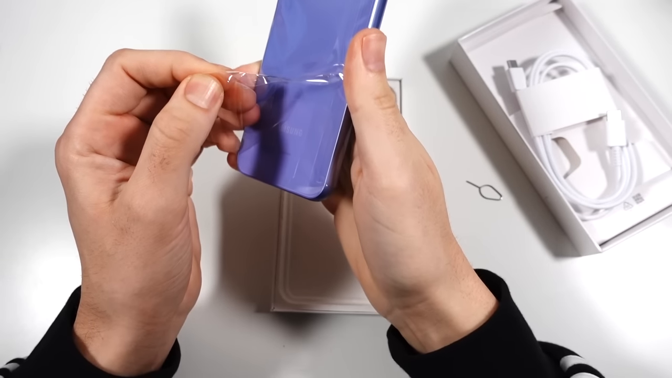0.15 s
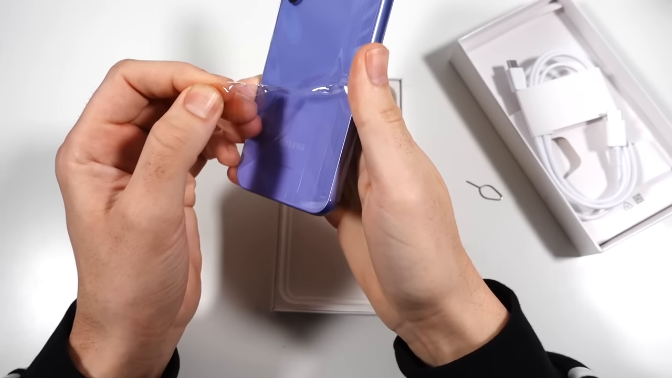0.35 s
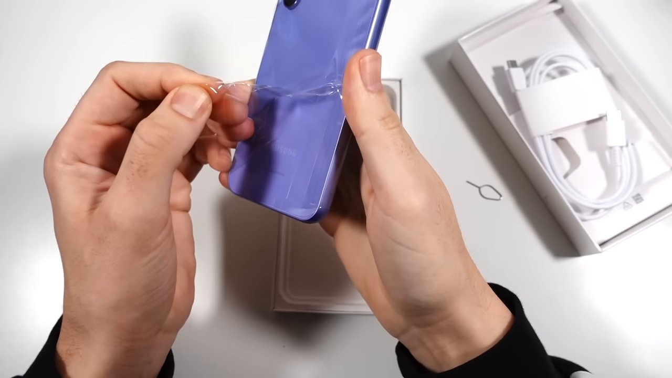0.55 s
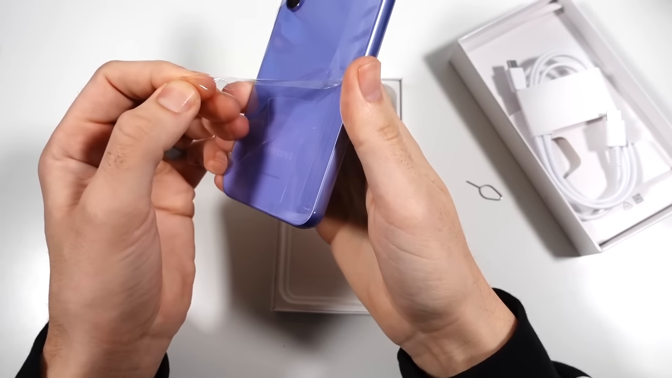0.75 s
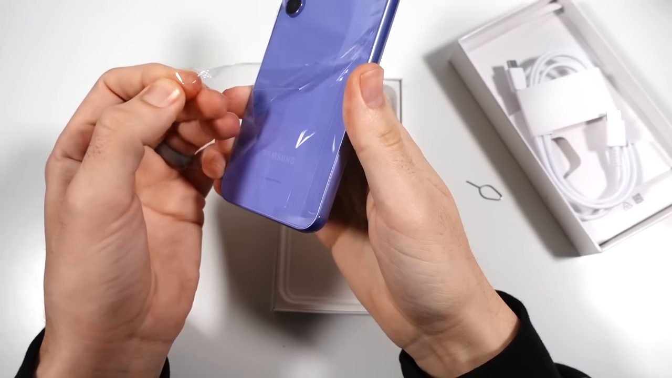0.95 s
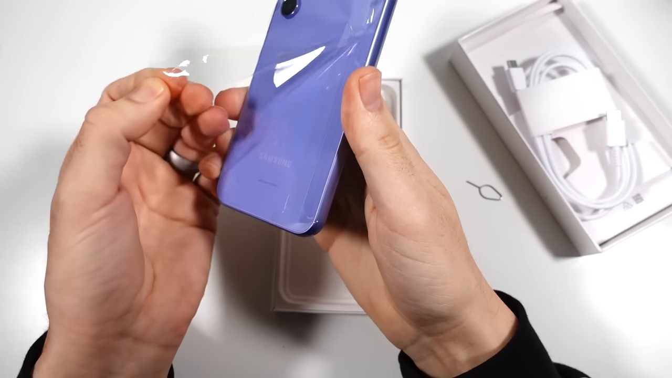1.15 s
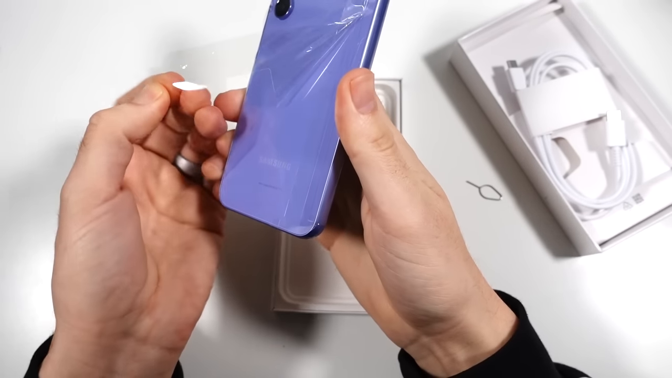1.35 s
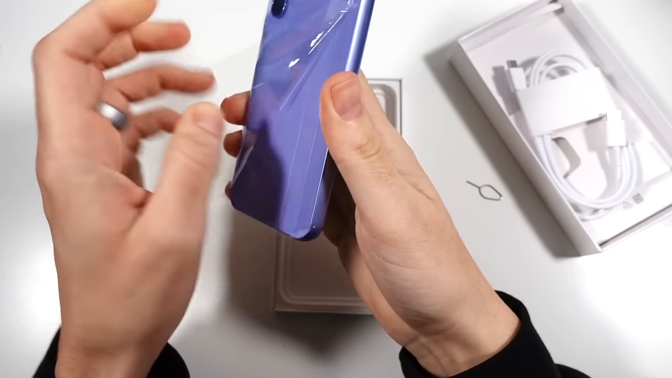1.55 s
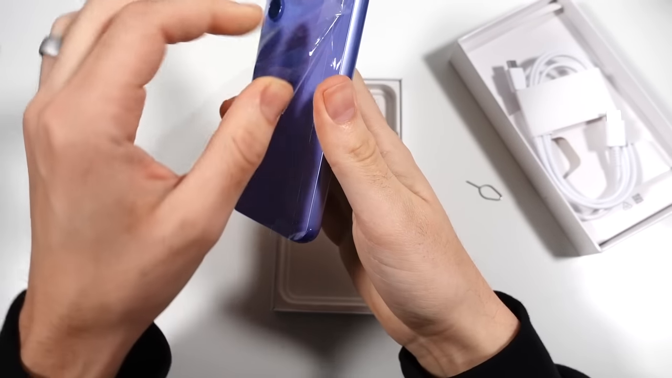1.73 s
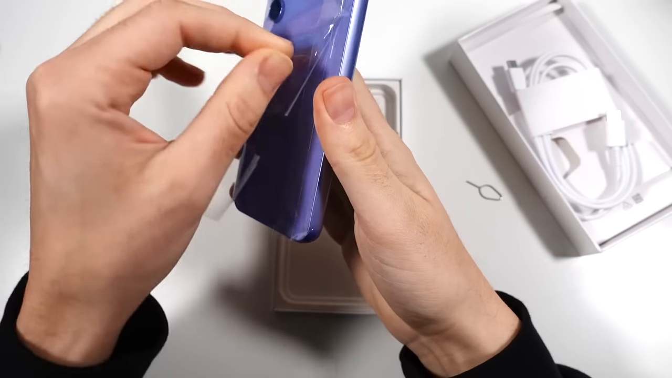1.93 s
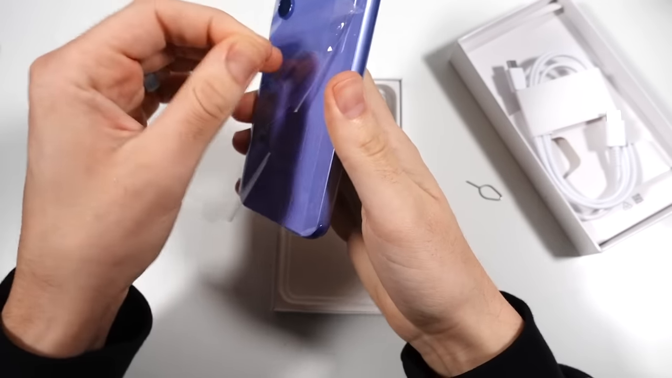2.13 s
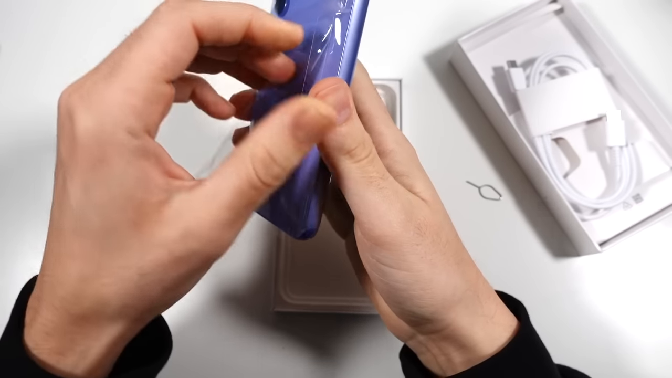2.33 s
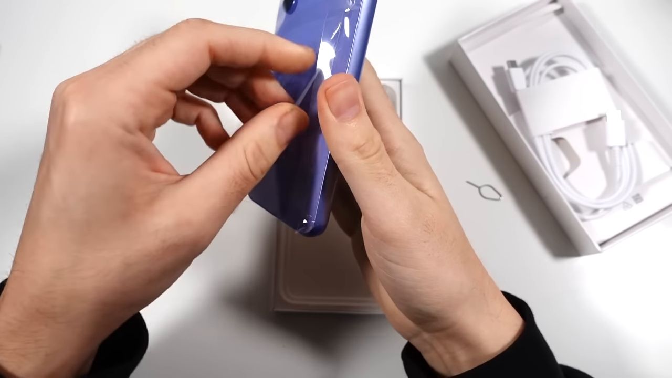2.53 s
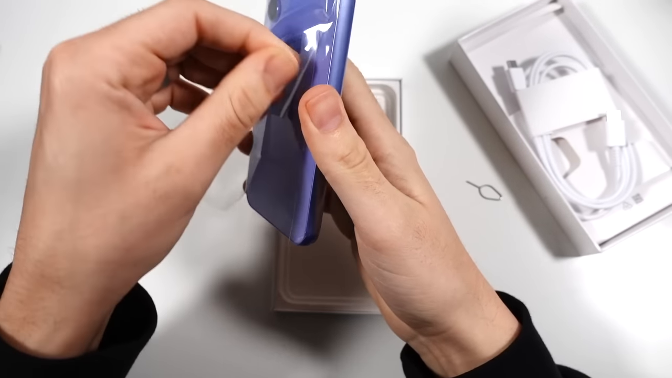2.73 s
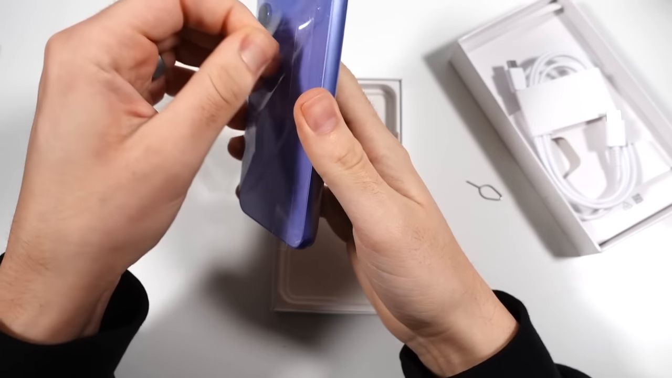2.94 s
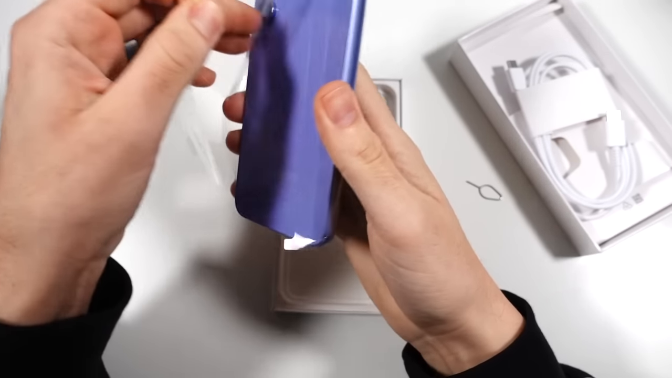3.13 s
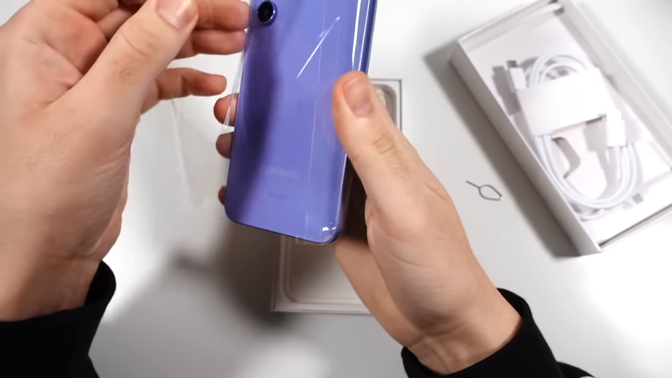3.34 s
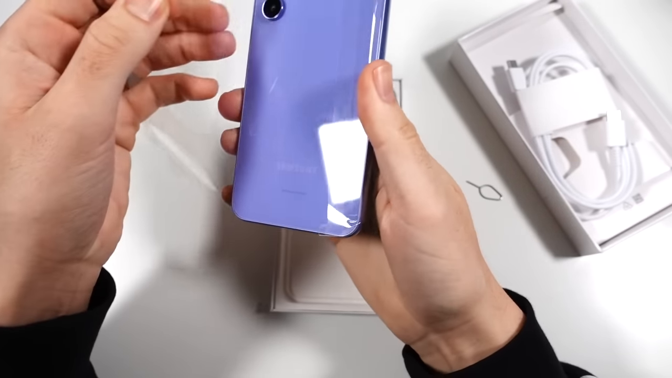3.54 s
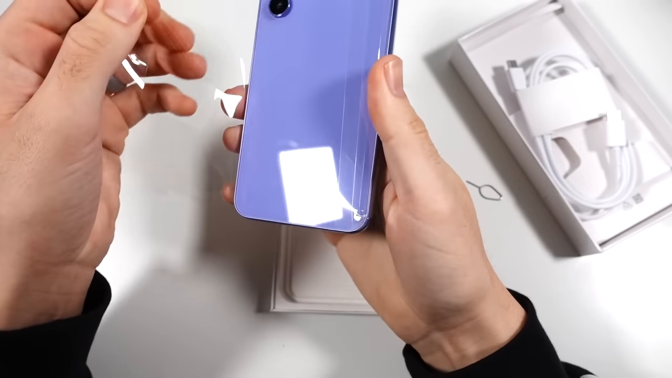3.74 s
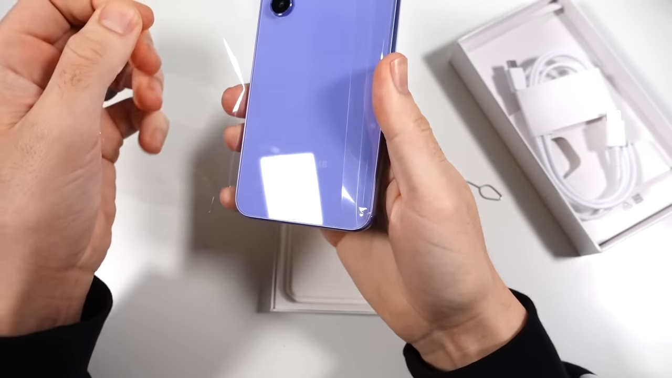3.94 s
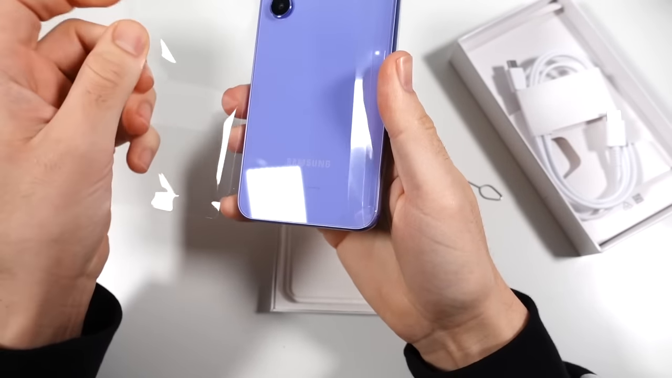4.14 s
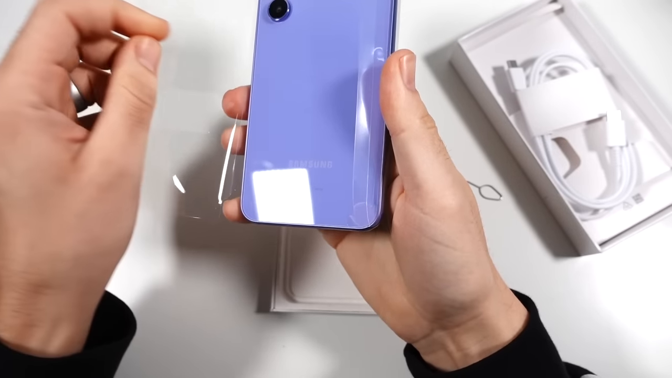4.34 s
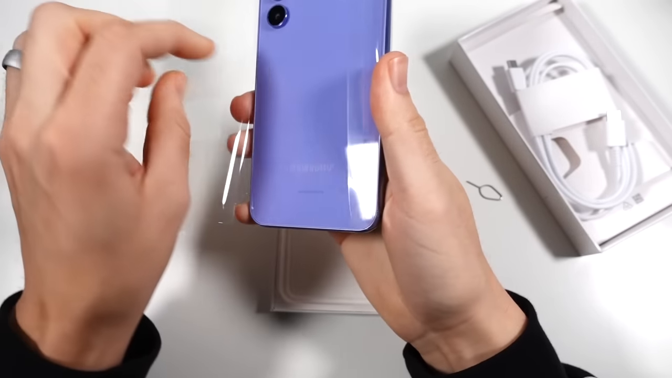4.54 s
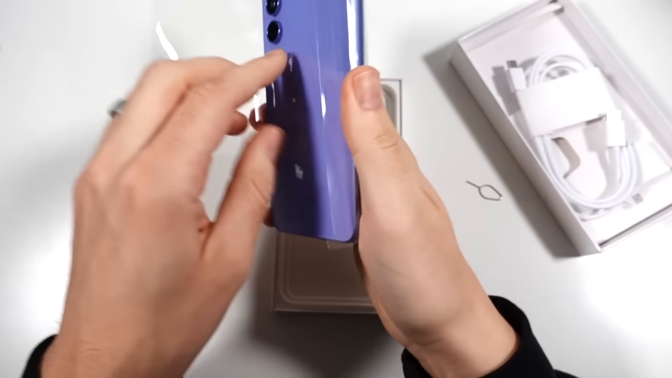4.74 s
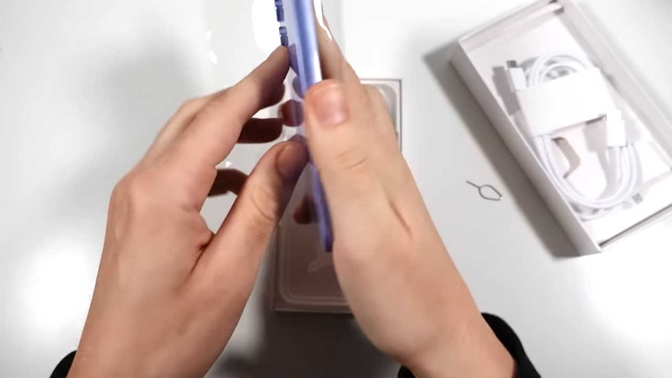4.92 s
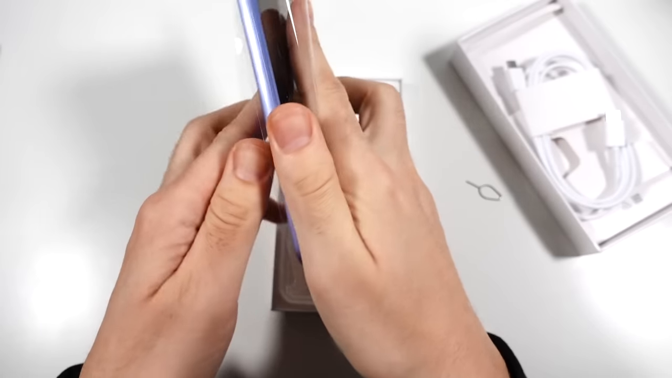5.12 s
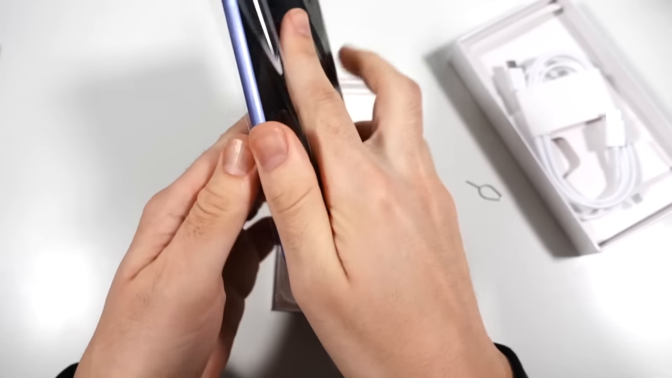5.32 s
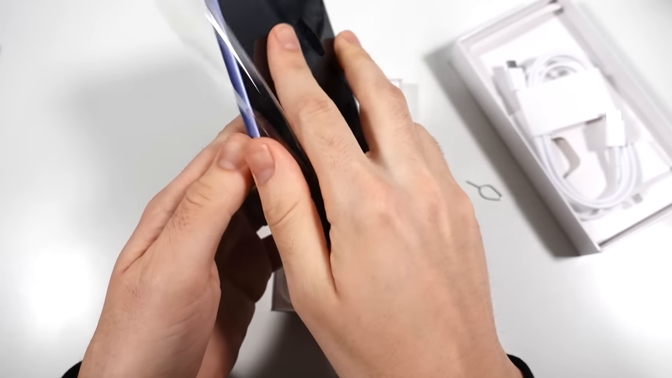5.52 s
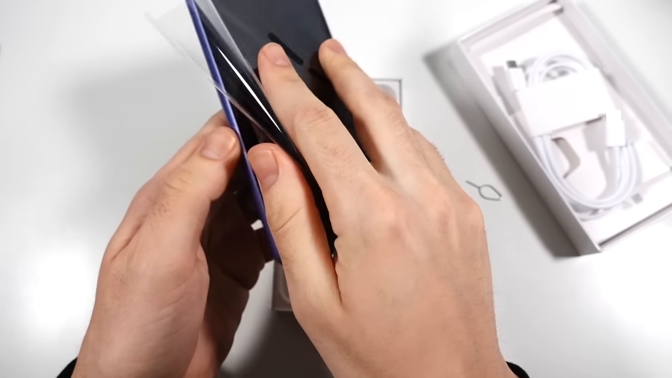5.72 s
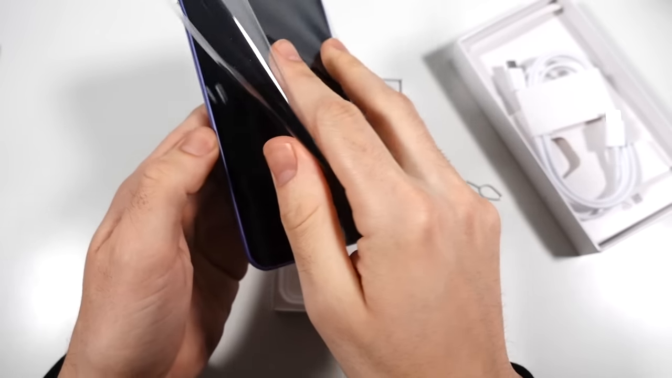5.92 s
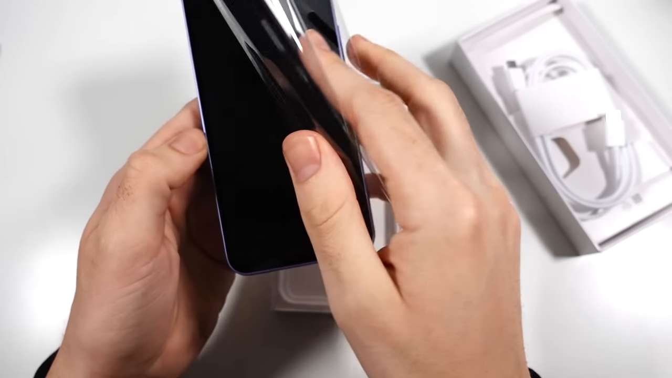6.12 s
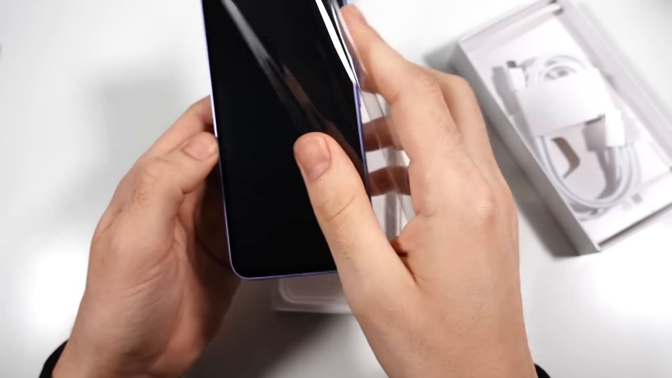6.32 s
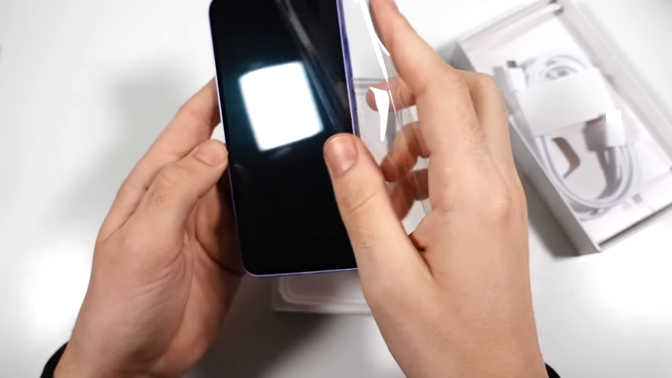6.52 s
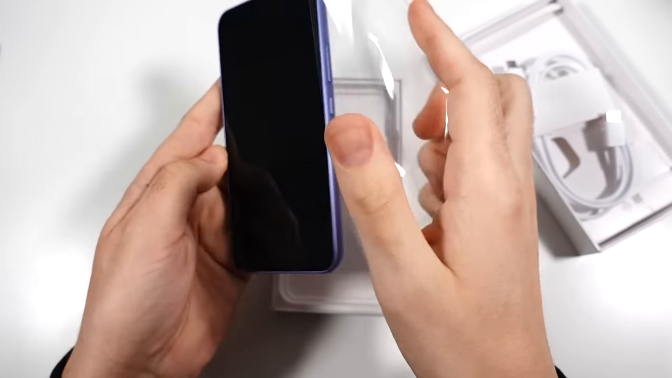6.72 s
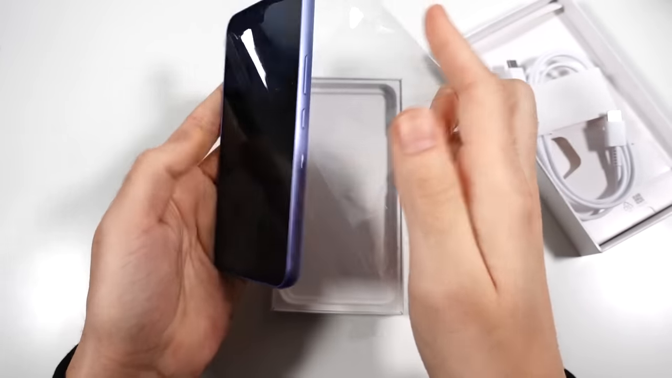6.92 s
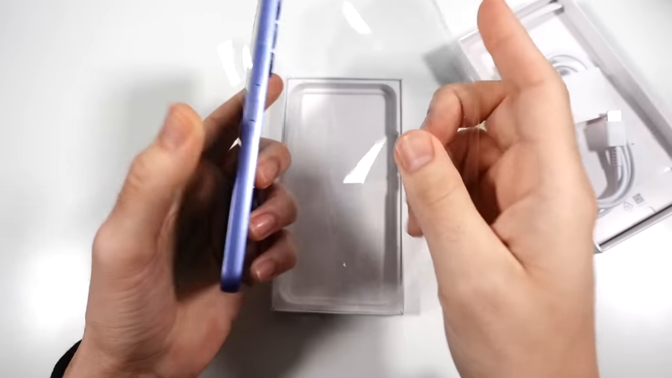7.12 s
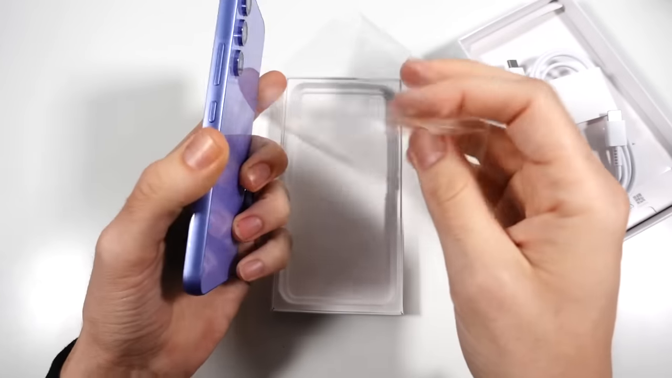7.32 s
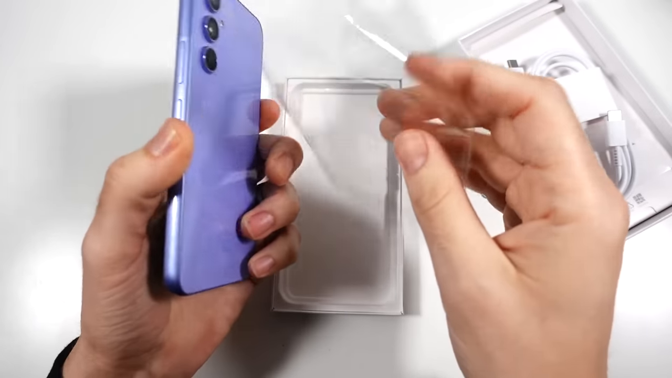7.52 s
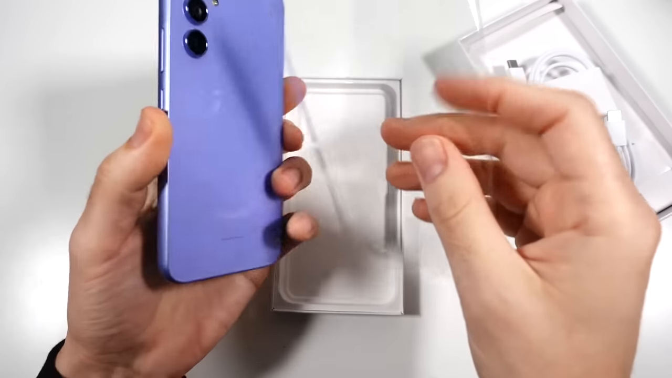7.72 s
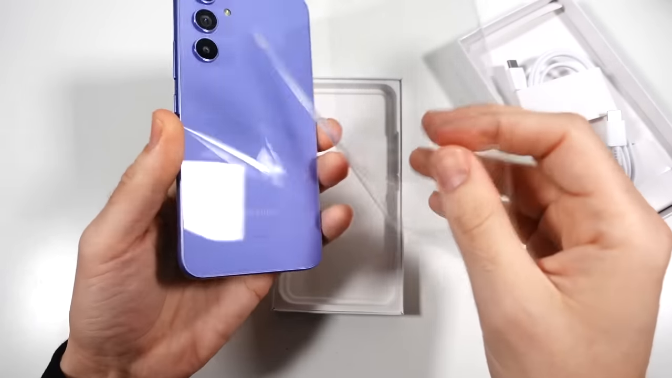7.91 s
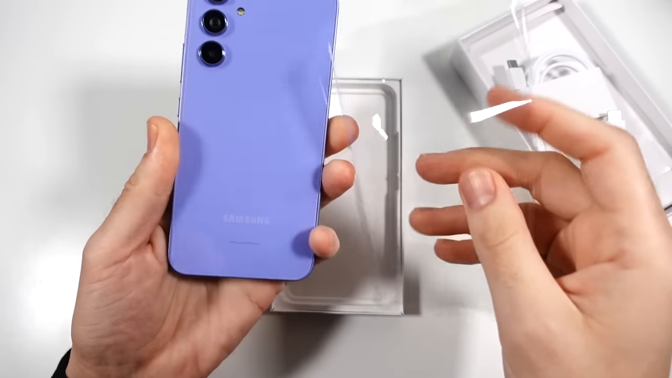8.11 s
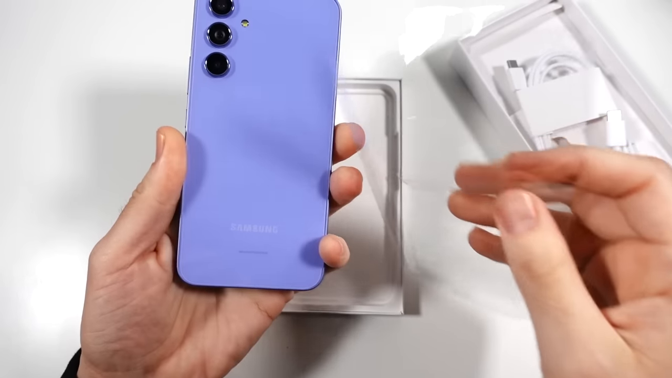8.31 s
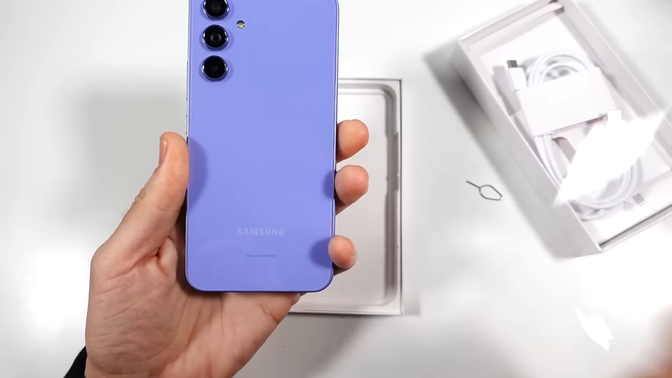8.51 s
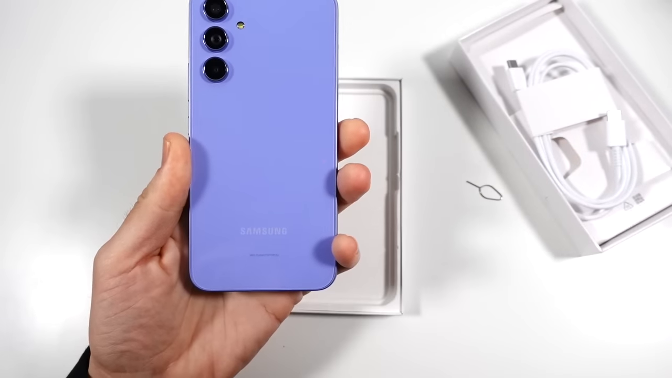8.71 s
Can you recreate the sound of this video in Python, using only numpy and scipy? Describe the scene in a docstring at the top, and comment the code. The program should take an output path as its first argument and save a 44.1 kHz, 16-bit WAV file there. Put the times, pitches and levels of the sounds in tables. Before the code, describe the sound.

Close, sharp crackles and light rustling of protective plastic being pulled from a phone by hand in a small room.

```python
"""Thin protective film, peeled off a phone by hand and pulled away, close-miked in a small, bare room.
Creases buckle with sharp snaps: short and bright in taut film, longer and duller in slack film.
Each pull makes the film crinkle and slide over the glass; near the end it squeaks under a fingertip.
The grip on the phone gives soft low bumps. The loudest snaps overload the recorder."""
import sys
import numpy as np
from scipy import signal
from scipy.fft import rfft, irfft, next_fast_len
from scipy.io import wavfile
from scipy.ndimage import uniform_filter1d

SR = 44100
rng = np.random.default_rng(int(sys.argv[2]) if len(sys.argv) > 2 else 0)


def wav_record(signal):
    """Record a signal, one row per channel, as 16-bit PCM in the file named by sys.argv[1]."""
    frames = np.transpose(np.atleast_2d(signal))
    bounded = np.clip(frames, -1, 1)
    # unit amplitude maps onto the largest positive 16-bit level
    quanta = np.round(bounded * 32767).astype(np.int16)
    wavfile.write(sys.argv[1], SR, quanta)


N = 390726
TIME = np.arange(N) / SR

# buckling creases: time_s, level_db, facet_hz, boom_re_level_db, sizzle_re_level_db
SNAPS = [(0.295, -59, 780, 13.5, -14), (.4093, -44.5, 3380, -5.5, -10), (.61, -33, 3360, -13.5, -12),
         (0.6486, -34, 8650, -21, -1), (0.722, -22.5, 6500, -11.5, 4.5), (0.7254, -13, 6240, -22.5, -2),
         (0.8476, -24.5, 6100, -33, 8.5), (.885, -14.5, 4930, -16.5, 4.5), (0.9323, -36, 7600, -24, 3),
         (0.9468, -36, 5660, -26, 5), (0.9951, -23.5, 6500, -23, -5.5), (1.0441, -33, 3630, -15, -4),
         (1.0897, -32.5, 3630, -15, -17), (1.1303, -35, 3750, -16, -20), (1.14, -23, 7300, -18.5, 1),
         (1.1779, -9, 3300, -10, -3.5), (1.231, -19.5, 7500, -20, -1), (1.4018, -33, 6400, -13, -12),
         (1.4177, -33.5, 3450, -5, -21), (1.445, -32.5, 2200, -21, -9.5), (1.455, -33.5, 5000, -10, -11),
         (1.4911, -27, 4540, -14.5, -7.5), (1.5, -38, 2290, -2, -4), (1.6256, -46.5, 3100, -6.5, -12.5),
         (1.8138, -47.5, 4300, -5, -13.5), (1.8604, -36, 6210, -17.5, -10), (1.954, -34.5, 3000, -30, -15),
         (2.0186, -41, 3300, -16, -14), (2.0299, -29, 4650, -17, -16), (2.042, -35.5, 6000, -26, -3),
         (2.061, -43, 4730, -18, -10), (2.216, -40, 3340, -7, -3), (2.2443, -47.5, 10000, 3, 3),
         (2.277, -45.5, 4940, -6, -8), (2.4974, -29.5, 4160, -14, -20), (2.5829, -39, 4940, -16, -9),
         (2.6527, -36.5, 5960, -11, -13), (2.8258, -51, 710, 1.5, -14), (2.8444, -53.5, 1440, 12, -27),
         (2.87, -36, 2940, -17, -20), (2.8887, -30, 4500, -21, -5), (2.9093, -14, 4400, -36, -7),
         (2.9665, -15, 4700, -21.5, -5), (2.9734, -12.5, 5500, -28, -3.5), (3.0307, -18.5, 5970, -45, -1.5),
         (3.0888, -26, 4870, -28, -2), (3.0955, -13.5, 5560, -19.5, -3.5), (3.1141, -15, 6200, -23, -0.5),
         (3.1191, -14, 4150, -15.5, -15), (3.1553, -21, 5910, -16, -12), (3.1657, -15.5, 2550, -13.5, -5),
         (3.2868, -30, 6000, -30, -7), (3.3173, -20.5, 6600, -7.5, -3.5), (3.3748, -28.5, 4900, -11, -4),
         (3.4957, -29, 2170, -1.5, -15.5), (3.6407, -21, 7800, -10.5, 0), (3.658, -30, 3140, -2.5, -5),
         (3.777, -34, 2820, -3.5, -26), (3.8237, -48, 755, 17.5, -19), (3.943, -53, 836, 11, -24),
         (4.0678, -52, 710, 10.5, -18), (4.1374, -21, 4000, -9.5, -4.5), (4.3687, -30, 2320, -0.5, -14),
         (4.388, -25.5, 3760, -1.5, -11), (4.3992, -26.5, 2340, -2, -2), (4.4461, -31.5, 6900, 6, 4),
         (4.453, -21, 5900, -4, -4.5), (4.4667, -24.5, 1050, -3.5, -22), (4.631, -34.5, 2560, -2.5, -15),
         (4.7748, -32, 2190, -6, -6), (4.7801, -24, 4270, -8, -9), (4.796, -31, 1500, -2, -26),
         (4.827, -38, 1340, 3, 0), (4.9143, -26, 1510, -2, -6), (4.9205, -17.5, 5600, -36, -12.5),
         (4.939, -34, 5440, -8, -15), (5.0523, -34.5, 1690, -0.5, -20), (5.1387, -25, 3200, -5, -4),
         (5.3344, -15, 5870, -25, -1.5), (5.4253, -30, 1620, -4.5, -23), (5.468, -29.5, 1320, -4, -9),
         (5.5658, -31, 5050, -22, 0), (5.5731, -22.5, 6060, -21, -3.5), (5.6547, -37, 4040, -8.5, -16),
         (5.674, -27.5, 1650, -4.5, -7.5), (5.7565, -26, 5800, -11.5, -16),
         (5.8976, -14.5, 3900, -18.5, -11), (5.9673, -23, 4840, -8.5, -10.5),
         (6.0487, -16.5, 2830, -10, -6.5), (6.067, -22, 3600, -14, -10), (6.0882, -28.5, 4000, -8, -16),
         (6.206, -36, 1430, -1, -19), (6.2547, -28, 3280, -10, -10), (6.2742, -15.5, 5270, -10, -4),
         (6.2885, -26, 3330, -7, -10), (6.4122, -26.5, 5170, -5.5, -11.5), (6.6259, -29, 5500, -7.5, -9),
         (6.7142, -28, 3770, -1.5, -23), (6.7735, -25, 3240, -14, -7), (6.8104, -27.5, 2840, -13, -21),
         (6.842, -24.5, 3080, -31, -9.5), (6.874, -28.5, 2520, -30, -12), (6.9051, -27.5, 6560, -22, -3),
         (7.064, -33.5, 2310, -2.5, -20), (7.0816, -33, 4470, -8, -18), (7.1084, -33, 2720, -14, -16),
         (7.1437, -19.5, 2520, -9, -9.5), (7.217, -13.5, 2090, -11, -11.5), (7.2285, -18.5, 5600, -12, -14),
         (7.278, -23.5, 3080, -8.5, -7), (7.3059, -19.5, 4740, -12, -9), (7.377, -43.5, 9400, 2, 11.5),
         (7.4785, -33, 5070, -12.5, -21), (7.53, -35.5, 4950, -6, -4), (7.577, -37.5, 3020, -6, -12),
         (7.6133, -27, 4870, -19, -31), (7.6384, -20.5, 4130, -24, -10), (7.711, -34, 4980, -8, -18),
         (7.8402, -42.5, 1480, 2, -6.5), (7.8515, -42, 4670, -6, -23), (7.8896, -44, 1900, 6, -7),
         (8.026, -44.5, 2780, 5, -22), (8.1223, -40.5, 3320, 1.5, -39), (8.2, -44.5, 920, 2.5, -18),
         (8.2193, -44, 3500, -4, -7), (8.2399, -38.5, 2830, -3, -17), (8.337, -39.5, 2950, -5, -8),
         (8.4344, -29.5, 5100, -13.5, -5), (8.485, -39, 4860, -9, -2), (8.508, -31.5, 5240, -25, -4),
         (8.5395, -24.5, 2580, -8, -4), (8.5634, -25.5, 4400, -21, -7), (8.5722, -26.5, 2780, -8, -8),
         (8.6173, -33.5, 1900, -11, -18), (8.643, -39, 6600, -10, -5), (8.7712, -44.5, 7400, -11, 5.5),
         (8.8477, -32.5, 10000, -21, 3)]
# how the film is held: time_s, slack (0-1), idle_rustle_db, idle_rumble_db
HOLD = [(0, 0, -70.5, -65), (.35, 0, -61.5, -67), (.58, 0.17, -84, -64.5), (.86, 0, -70, -60.5),
        (1.45, 0.22, -53.5, -62.5), (1.78, 0.3, -80, -62), (2.1, 0.32, -62.5, -61.5),
        (2.42, 0.26, -67, -64.5), (2.92, 0.09, -62.5, -59), (3.2, 0.3, -62.5, -63), (4, 0.03, -65.5, -55.5),
        (4.4, 0.6, -59.5, -55.5), (5.32, 0.19, -58, -57), (5.55, 0.57, -46.5, -61), (6.3, 0.5, -58, -56.5),
        (7.2, 0.53, -56, -55), (8, 0.45, -57.5, -49.5), (8.35, 0.73, -55.5, -63.5), (8.86, 0.3, -53.5, -61)]


def amp(db):
    return 10 ** (np.asarray(db) / 20)


def unit_energy(x):
    return x / np.sqrt(np.sum(x ** 2) + 1e-20)


def unit_rms(x):
    return unit_energy(x) * np.sqrt(len(x))


def at_hz(points, hz):
    """Interpolate on a log-frequency axis."""
    point_hz, value = np.transpose(points)
    return np.interp(np.log(hz + 1), np.log(point_hz + 1), value)


def hold_curve(column):
    rows = np.array(HOLD)
    return np.interp(TIME, rows[:, 0], rows[:, column])


def by_slack(taut, slack):
    """Per-sample blend of a taut-film and a slack-film value."""
    return taut + (slack - taut) * hold_curve(1)


def add(mix, start_s, sound):
    part = mix[max(round(start_s * SR), 0):][:len(sound)]
    part += sound[:len(part)]


def response(points, size=2048):
    """Minimum-phase taps from freq_hz, gain_db points."""
    log_gain = np.log(amp(at_hz(points, abs(np.fft.fftfreq(size, 1 / SR)))))
    spectrum = np.exp(np.conj(signal.hilbert(log_gain)))
    return np.fft.ifft(spectrum).real[:size // 2]


def fir(x, taps):
    return signal.oaconvolve(x, taps)[:len(x)]


def gesture(length_s, attack_s, release_s, sag_db=-1):
    """Envelope of one hand movement: attack, sagging hold, release."""
    t = TIME[:SR]
    attack = np.minimum(t / attack_s, 1)
    sag = amp(sag_db * np.minimum(t / length_s, 1))
    return attack * sag * np.exp(-np.maximum(t - length_s, 0) / release_s)


def film_mode(x, hz, width_hz):
    """One resonance of the film, at unit energy."""
    r = np.exp(-np.pi * width_hz / SR)
    return unit_energy(signal.lfilter([1, 0, -1], [1, -2 * r * np.cos(2 * np.pi * hz / SR), r * r], x))


def bending_waves(t60_s, crack):
    """A crack, then waves that bounce about the film and die fast."""
    t = TIME[:2048]
    waves = unit_energy(rng.standard_normal(len(t)) * amp(-60 * t / max(t60_s, .002)))
    return unit_energy(waves + crack * (t == 0))


def effort(release_s=0.012, stir_s=0.015, stir_lead_s=0.0031):
    """Film level (dB) and power-weighted tilt (dB/oct) from idle rustle, pulls and snaps."""
    # pulls and crumples: start_s, length_s, level_db, tilt_db_per_oct
    pulls = [(0, 0.077, -70, 11), (.385, 0.068, -53, 2), (0.704, 0.035, -48, 0.5), (0.831, 0.23, -46, 4),
             (1.196, .11, -47, -1), (1.429, 0.05, -44, -3), (1.58, 0.059, -55.5, -4),
             (1.936, 0.011, -52, 0), (1.995, 0.082, -50, 1.5), (2.101, 0.029, -59.5, 6.5),
             (2.162, .11, -49.5, 3), (2.295, .025, -52.5, 2.5), (2.344, .022, -59, 5),
             (2.499, 0.055, -46, 1), (2.595, .1, -56, 5), (2.74, .04, -51, -1), (2.89, 0.19, -42, 2),
             (3.099, 0.18, -40.5, 1), (3.149, 0.012, -22.5, 2.5), (3.225, 0.2, -41.5, -2.5),
             (3.633, .04, -45, -5.5), (3.822, 0.027, -43, -3.5), (4.133, 0.04, -42.5, -6.5),
             (4.281, 0.098, -64.5, -20), (4.365, 0.12, -45, -1), (4.644, 0.018, -46.5, -4),
             (4.755, 0.1, -41.5, -4), (4.921, 0.026, -34.5, -2), (5.134, 0.0635, -43.5, -3.5),
             (5.338, 0.27, -46, -1.5), (5.554, 0.045, -30.5, -.5), (5.641, 0.036, -39.5, -4),
             (5.699, .15, -46, 0.5), (5.913, 0.099, -46, -4.5), (6.046, 0.041, -28.5, -1.5),
             (6.108, 0.025, -37, -1), (6.25, 0.11, -46, 1), (6.369, 0.14, -41, 0.5), (6.614, 0.06, -39, -2),
             (6.69, 0.14, -35, 0), (6.745, 0.18, -34, -2), (7.047, 0.11, -45, -4.5),
             (7.196, 0.14, -33, -1.5), (7.343, 0.044, -36.5, 1), (7.39, 0.12, -55, 9),
             (7.57, 0.018, -40.5, -1), (7.606, 0.051, -34.5, -3), (7.747, 0.028, -44, -2),
             (7.92, 0.098, -55, -3.5), (8.15, 0.044, -46, -2.5), (8.502, 0.081, -35.5, -1.5)]
    power = amp(hold_curve(2)) ** 2
    weighted_tilt = -0.11 * power
    for start_s, length_s, level_db, tilt_db_per_oct in pulls:
        pull = (amp(level_db) * gesture(length_s, 0.2 * length_s, release_s)) ** 2
        add(power, start_s, pull)
        add(weighted_tilt, start_s, tilt_db_per_oct * pull)
    # small creases stir around each snap
    stir_db = by_slack(taut=-26.5, slack=-15.5)
    for time_s, level_db, *_ in SNAPS:
        stir = amp(level_db + stir_db[round(time_s * SR)]) * gesture(stir_s, stir_lead_s, release_s)
        add(power, time_s - stir_lead_s, stir ** 2)
    return 10 * np.log10(power), weighted_tilt / power


def sliding(catch_db=3.5, catch_s=0.0024):
    """Film on glass: a hiss that catches and lets go."""
    grab = unit_rms(uniform_filter1d(rng.standard_normal(N), int(catch_s * SR)))
    return unit_rms(rng.standard_normal(N) * amp(catch_db * grab))


def tiny_creases(ticks_per_s=330, spread_db=3.5, count=24):
    """Small creases tick at random, each at its own pitch; a few ticks stand out."""
    out = np.zeros(N)
    for hz in np.geomspace(700, 12000, count):
        strength = amp(spread_db * np.minimum(rng.exponential(1, N), 3.5))
        ticks = strength * (rng.random(N) < ticks_per_s / count / SR)
        waves = bending_waves(t60_s=rng.uniform(0.02, 0.064), crack=0.75)
        ring = 0.97 * np.sqrt(hz / 10000) * film_mode(waves, hz, width_hz=0.063 * hz)
        out += fir(ticks, unit_energy(waves + ring))
    return unit_rms(out)


def crinkle(gain_db=0.5, tick_db=10, leveling_s=0.057, pivot_hz=3000):
    """Film slides under light effort and ticks under more; slack film buckles sooner."""
    # crinkle spectrum: freq_hz, density_db
    film_spectrum = [(100, -18.5), (250, -7.5), (400, -7), (600, 1.5), (800, -1.5), (1800, 2.5), (3000, 3),
                     (5000, 2.5), (7000, -0.5), (10000, -7), (12500, -14), (16000, -21.5)]
    effort_db, tilt_db_per_oct = effort()
    buckle_db = by_slack(taut=-51, slack=-62)
    tick_gain = amp(tick_db + np.minimum(effort_db - buckle_db, 0))
    grains = sliding() + tick_gain * tiny_creases()
    grains /= np.sqrt(uniform_filter1d(grains ** 2, int(leveling_s * SR)) + 1e-9)
    # time-varying tilt over seven octave bands
    size = next_fast_len(N)
    spectrum = rfft(unit_rms(fir(grains, response(film_spectrum))), size)
    octave = np.clip(np.log2((np.fft.rfftfreq(size, 1 / SR) + 1) / pivot_hz), -3, 3)
    out = np.zeros(N)
    for centre_oct in range(-3, 4):
        band = irfft(spectrum * np.maximum(1 - abs(octave - centre_oct), 0), size)[:N]
        out += band * amp(tilt_db_per_oct * centre_oct)
    return amp(effort_db + gain_db) * out


def handling(gain_db=-1, jolts_per_s=45, spread_db=7.5, rub=0.53):
    """Fingers shift on the phone in small jolts over light, steady rubbing."""
    # grip shifts: start_s, length_s, level_db
    shifts = [(0.873, .02, -63.5), (1.064, 0.1, -53), (1.463, 0.045, -52), (2.491, 0.028, -48),
              (3.02, .15, -52), (3.31, .025, -55), (3.47, 0.038, -49), (4.121, 0.025, -39),
              (4.368, 0.093, -36.5), (4.769, 0.024, -42), (4.917, 0.028, -46), (5.125, 0.042, -48),
              (5.407, 0.23, -51.5), (6.744, 0.17, -42.5), (7.064, 0.31, -49.5), (7.613, 0.023, -36),
              (7.85, 0.31, -60)]
    # handling rumble spectrum: freq_hz, density_db
    rumble_spectrum = [(10, -23), (25, -4), (45, -1.5), (65, 0.5), (100, -4), (150, -12), (220, -17),
                       (400, -24), (1000, -53.5)]
    grip = amp(hold_curve(3))
    for start_s, length_s, level_db in shifts:
        add(grip, start_s, amp(level_db) * gesture(length_s, attack_s=0.0044, release_s=0.017))
    jolts = rng.standard_normal(N) * amp(spread_db * rng.exponential(1, N))
    jolts *= rng.random(N) < jolts_per_s / SR
    force = unit_rms(jolts) + rub * rng.standard_normal(N)
    rumble = fir(force, response(rumble_spectrum, size=16384))
    rumble /= np.sqrt(uniform_filter1d(rumble ** 2, size=4500) + 1e-9)
    return amp(gain_db) * grip * rumble


def room_air(level_db=-68):
    """Steady noise of still air."""
    # room tone: freq_hz, density_db
    air_spectrum = [(40, -17), (120, -16), (220, -4.5), (400, -21), (1000, -28), (3000, -33.5), (8000, -29),
                    (16000, -42)]
    return amp(level_db) * unit_rms(fir(rng.standard_normal(N), response(air_spectrum, size=16384)))


def bumps():
    """Soft knocks of hands and arms; each swells and dies on one low note."""
    # knocks: start_s, level_db, pitch_hz, swell_s
    knocks = [(0.099, -48, 29.4, 0.19), (1.797, -48.5, 122, 0.0062), (7.89, -40, 98, 0.024)]
    out, t = np.zeros(N), TIME[:SR]
    for start_s, level_db, pitch_hz, swell_s in knocks:
        envelope = t / swell_s * np.exp(1 - t / swell_s)
        add(out, start_s, amp(level_db) * envelope * np.sin(2 * np.pi * pitch_hz * t))
    return out


def snaps(crack, mode_share, pivot_hz=4000):
    """A crease flips: its facet rings, the sheet booms, the fold sizzles. Large, low facets ring longest."""
    # facets beside a crease: freq_hz, density_db
    facet_spectrum = [(500, -46), (1100, -12), (1550, -5.5), (2500, 1.5), (4000, 2.5), (6300, 0.5),
                      (7500, -11), (10000, -41.5)]
    # whole sheet, jolted: freq_hz, density_db
    sheet_spectrum = [(30, -15.5), (100, -2.5), (200, -5.5), (330, -9), (550, -1), (780, 0), (1000, -1),
                      (1400, -3.5), (1800, -4.5), (3000, -41.5)]
    # crack at the fold: freq_hz, density_db
    fold_spectrum = [(4000, -38.5), (6200, -1), (7200, 7), (9500, 2), (12000, -4.5), (14500, -8.5),
                     (16500, -15)]
    facet, sheet = response(facet_spectrum), response(sheet_spectrum)
    pivot_t60_s = by_slack(taut=0.006, slack=0.043)
    tilt_db_per_oct = by_slack(taut=4.5, slack=-9)
    scale = np.sqrt(.005 * SR)  # energy of 5 ms at rms 1
    out = np.zeros(N)
    for time_s, level_db, facet_hz, boom_db, sizzle_db in SNAPS:
        i = round(time_s * SR)
        t60_s = pivot_t60_s[i] * (pivot_hz / facet_hz) ** 0.42
        fold = response([(hz, db + tilt_db_per_oct[i] * np.log2(hz / pivot_hz))
                         for hz, db in fold_spectrum])
        parts = (facet, 0, t60_s), (sheet, boom_db, 2.6 * t60_s), (fold, sizzle_db, 0.7 * t60_s)
        for taps, part_db, part_t60_s in parts:
            waves = bending_waves(part_t60_s, crack)
            waves += mode_share * film_mode(waves, facet_hz, width_hz=0.11 * facet_hz)
            add(out, time_s, scale * amp(level_db + part_db) * unit_energy(fir(waves, taps)))
    return out


def squeaks(jitter=0.078, overtone=0.92):
    """Stick-slip under a fingertip: an unsteady whistle, rising as the film tightens."""
    # slips: start_s, length_s, first_hz, last_hz, level_db
    slips = [(7.441, .054, 3700, 5540, -41), (8.793, .03, 3630, 6600, -61)]
    out = np.zeros(N)
    for start_s, length_s, first_hz, last_hz, level_db in slips:
        progress = np.linspace(0, 1, int(length_s * SR))
        wobble = unit_rms(uniform_filter1d(rng.standard_normal(SR), size=16))[:len(progress)]
        glide_hz = first_hz + (last_hz - first_hz) * np.sqrt(progress)
        phase = 2 * np.pi * np.cumsum(glide_hz * (1 + jitter * wobble)) / SR
        tone = np.sin(phase) + overtone * np.sin(2 * phase)
        add(out, start_s, amp(level_db) * np.sin(np.pi * progress) * tone)
    return out


def reverb(x, tail_db=-18, build_s=0.011):
    """Faint tail from the bare walls."""
    # room decay: freq_hz, t60_s
    decay = [(100, .5), (400, 0.78), (1000, 0.5), (3000, 0.64), (6000, 0.61), (10000, 0.41), (16000, 0.43)]
    # tail colour: freq_hz, gain_db
    colour = [(100, -9), (400, 8.5), (1000, 7), (2300, 0.5), (4500, 2.5), (6500, 0), (10000, 2),
              (16000, 1.5)]
    hz, t, bins = signal.stft(rng.standard_normal(SR), SR, nperseg=256)
    bins *= amp(at_hz(colour, hz)[:, None] - 60 * t / at_hz(decay, hz)[:, None])
    tail = signal.istft(bins, SR, nperseg=256)[1][:SR]
    tail *= 1 - np.exp(-TIME[:SR] / build_s)
    return amp(tail_db) * fir(x, unit_energy(tail))


def scene(desk_db=-17, desk_delay_s=.0024):
    """Film heard direct, off the desk and off the walls, plus hands and air; mono."""
    rustle = crinkle() + squeaks()
    direct = snaps(crack=0.35, mode_share=0.35) + rustle
    desk = amp(desk_db) * np.interp(TIME - desk_delay_s, TIME, direct, left=0)
    # walls gather sound from all directions, so no one pitch stands out
    walls = reverb(snaps(crack=3.6, mode_share=0.067) + rustle)
    return (direct + desk + walls + handling() + bumps() + room_air())[None]


def record(dry, cutoff_hz=16100):
    """Clip at full scale, then low-pass."""
    lowpass = signal.firwin(255, cutoff_hz, window=("kaiser", 8), fs=SR)
    return signal.oaconvolve(np.clip(dry, -1, 1), lowpass[None], "same")


dry = scene()
out = record(dry)
wav_record(out)
```